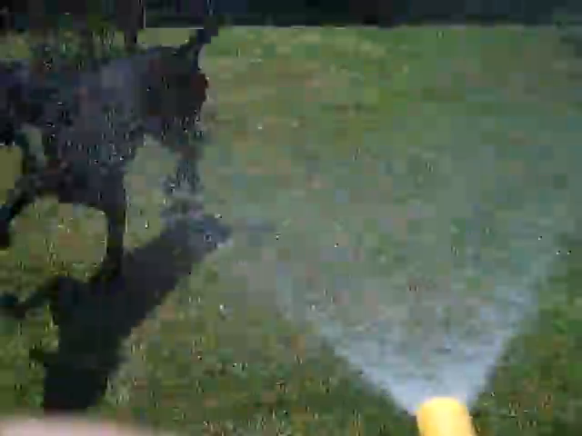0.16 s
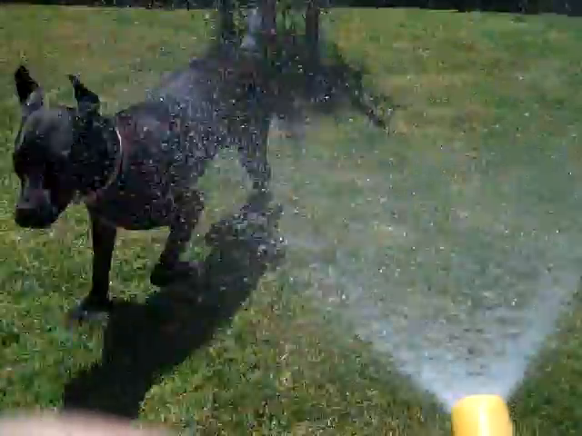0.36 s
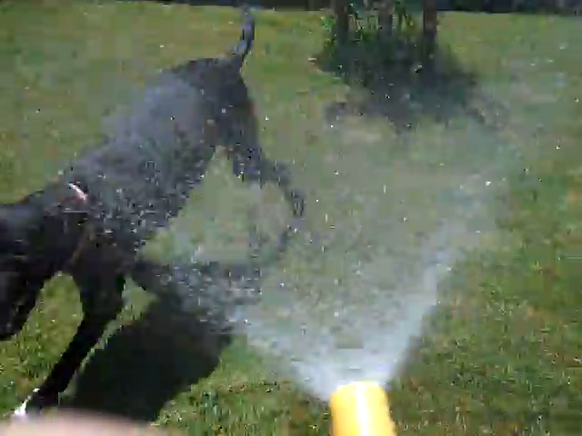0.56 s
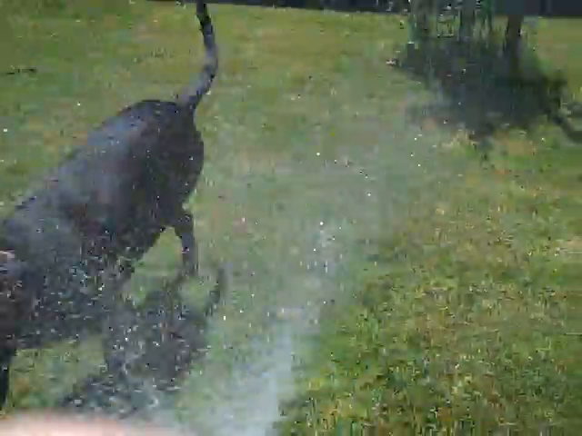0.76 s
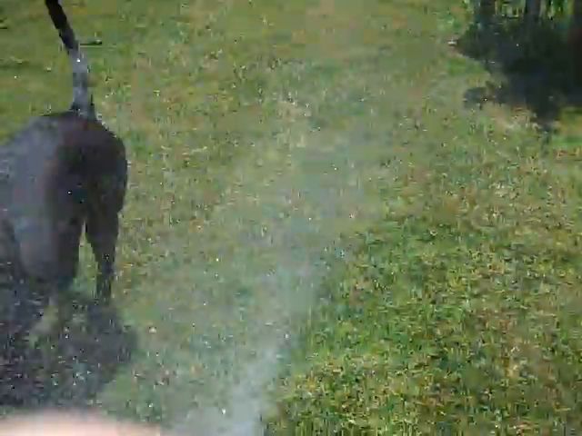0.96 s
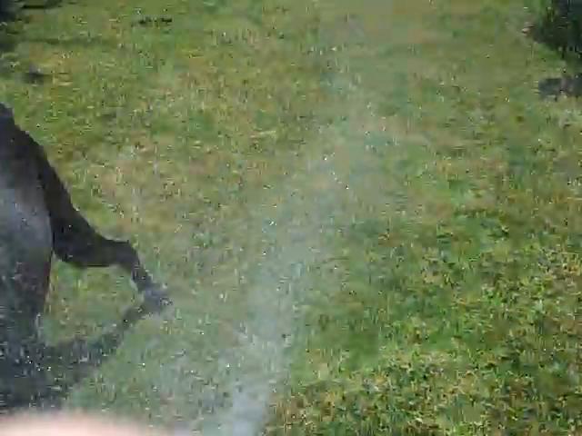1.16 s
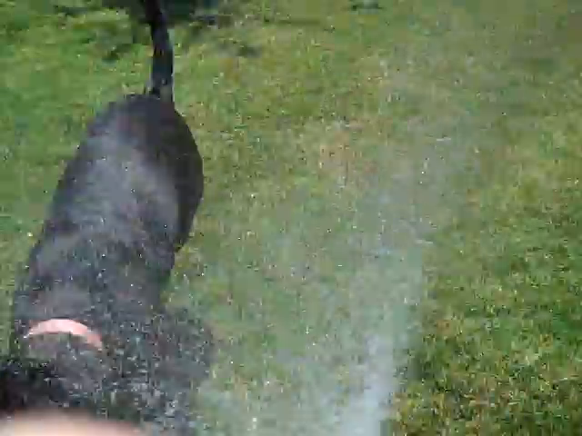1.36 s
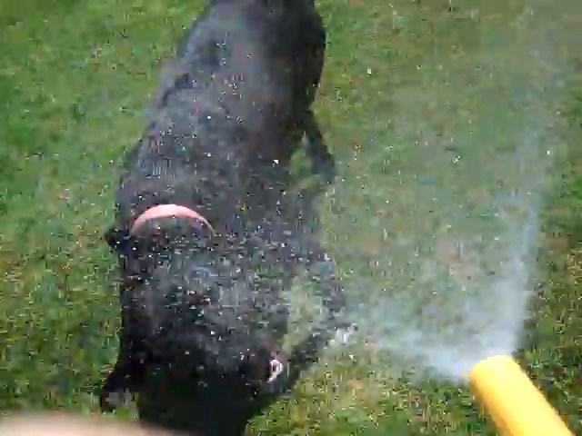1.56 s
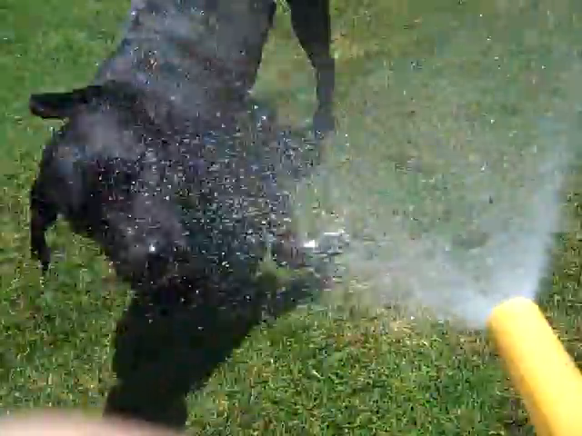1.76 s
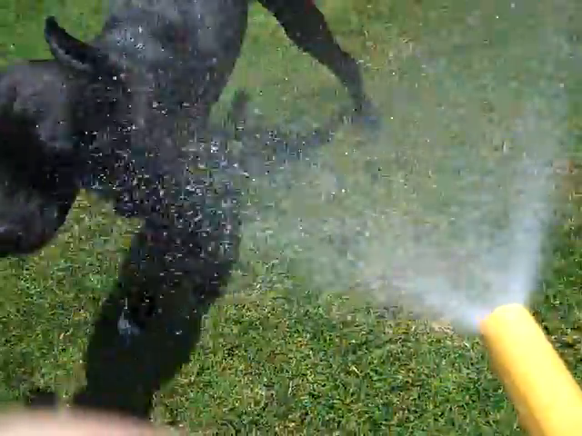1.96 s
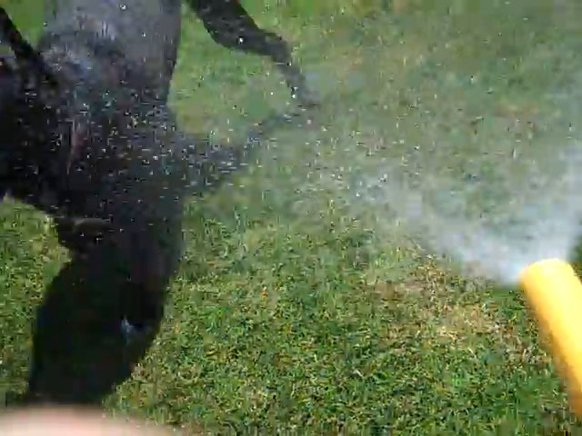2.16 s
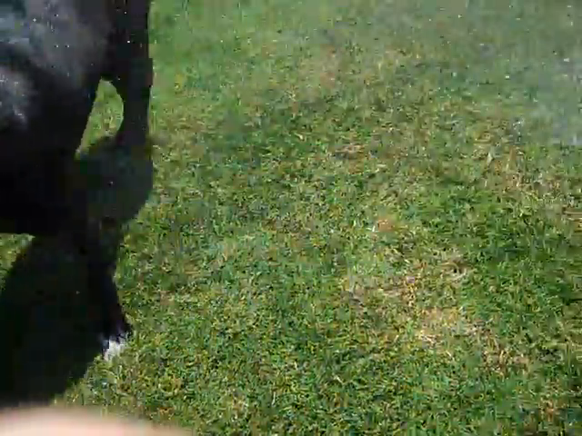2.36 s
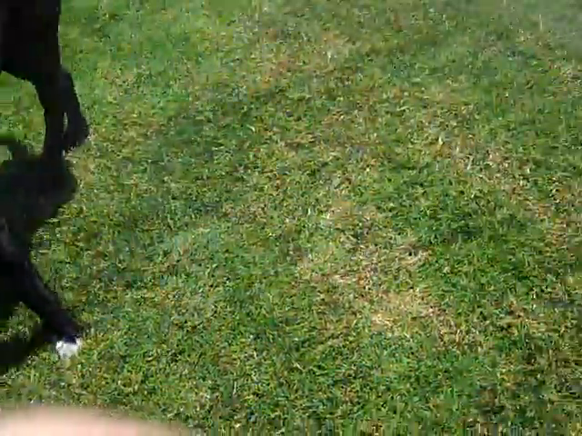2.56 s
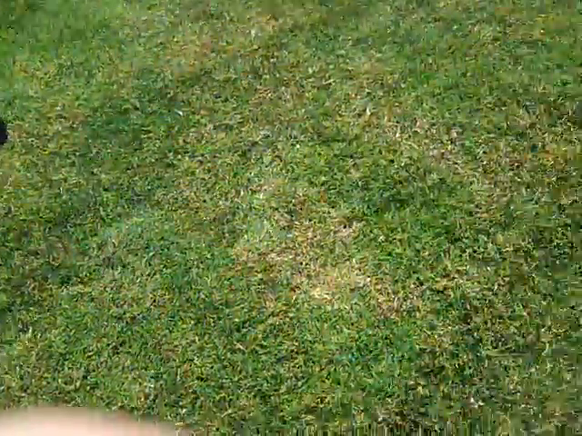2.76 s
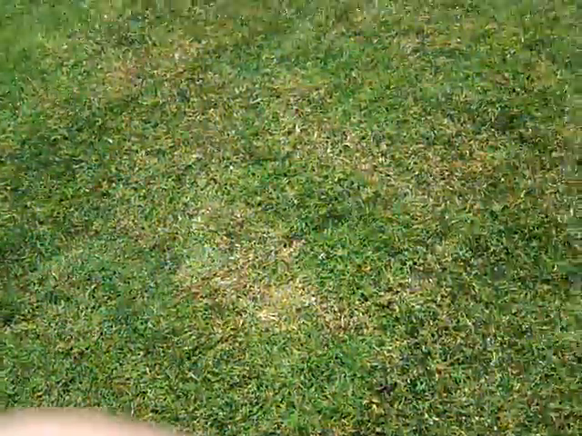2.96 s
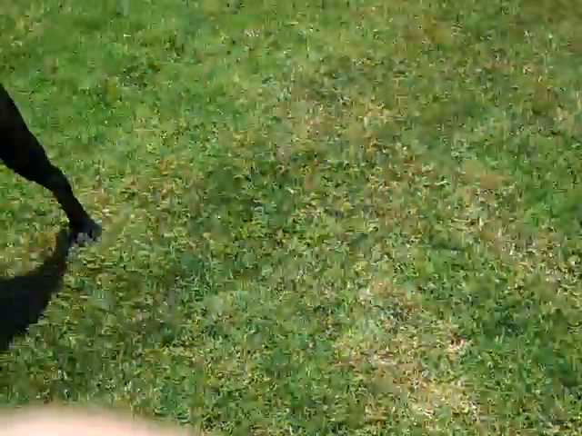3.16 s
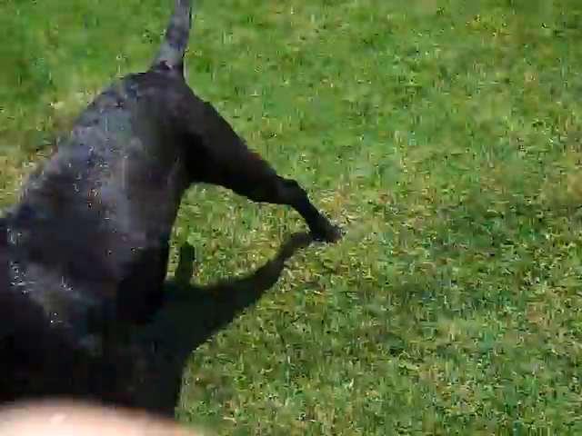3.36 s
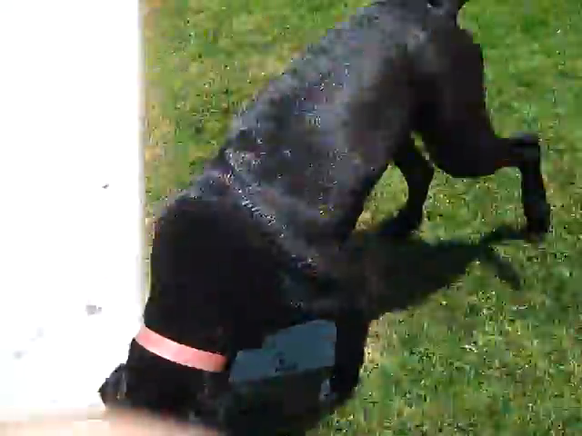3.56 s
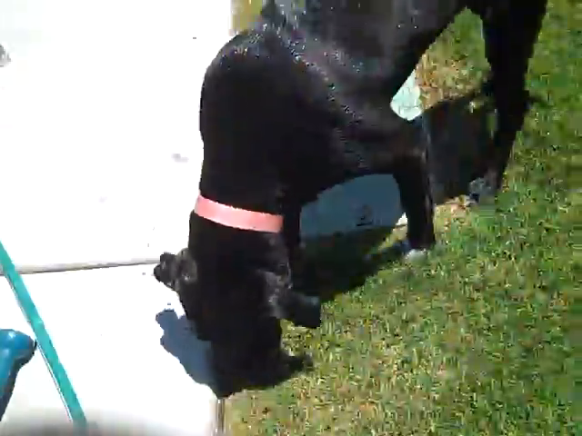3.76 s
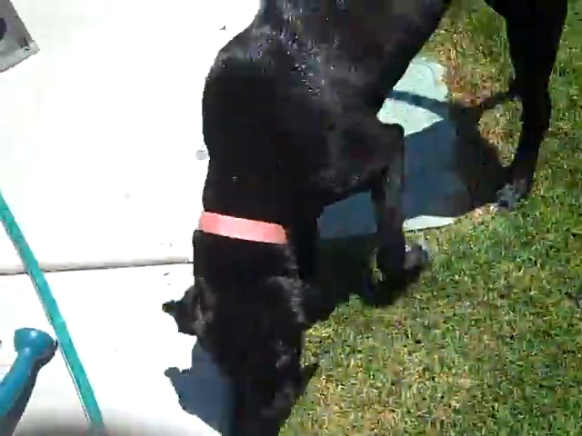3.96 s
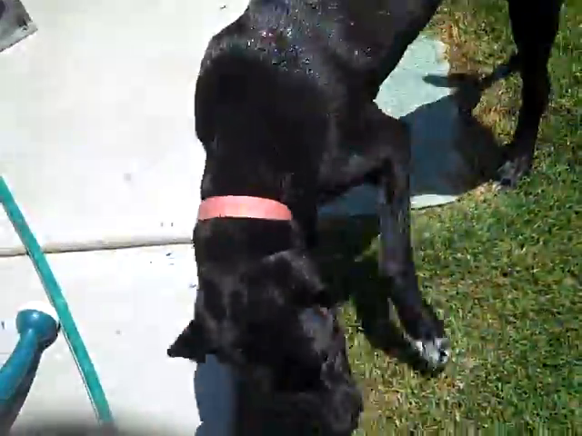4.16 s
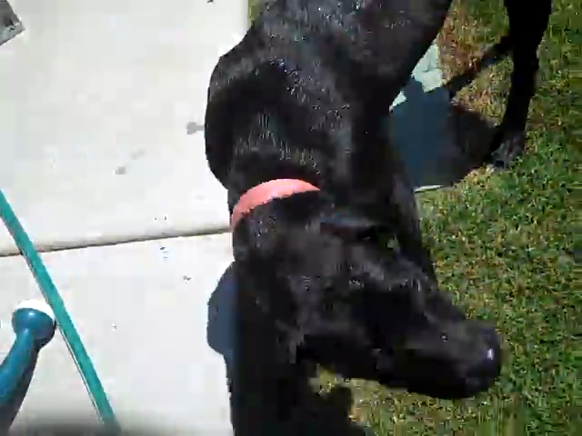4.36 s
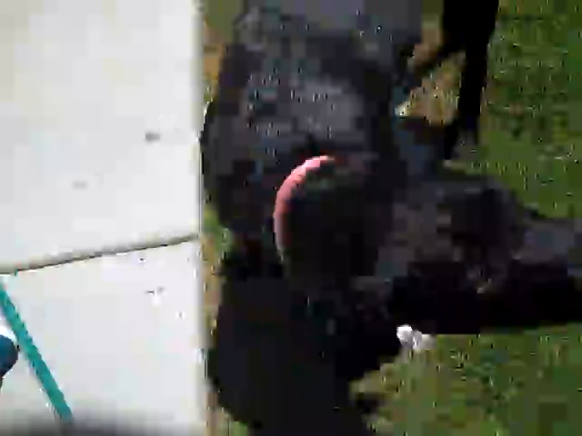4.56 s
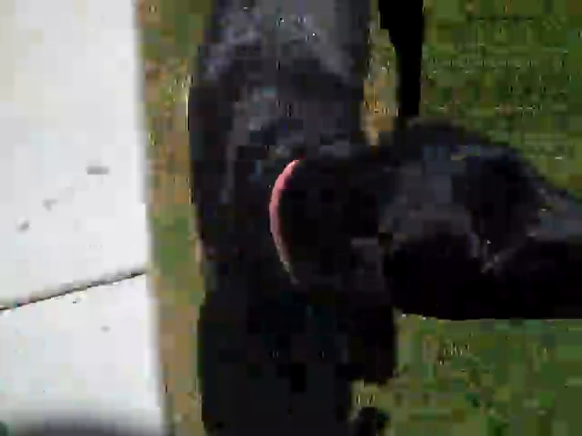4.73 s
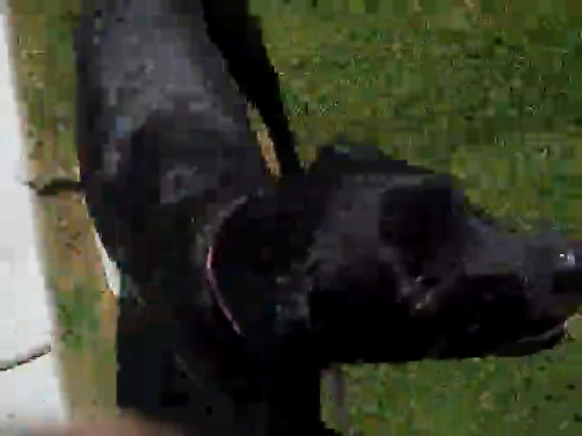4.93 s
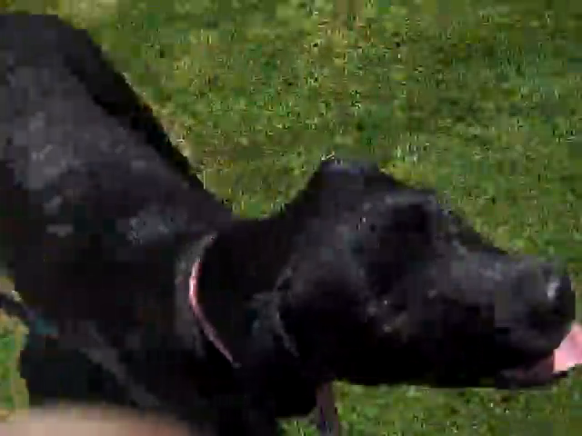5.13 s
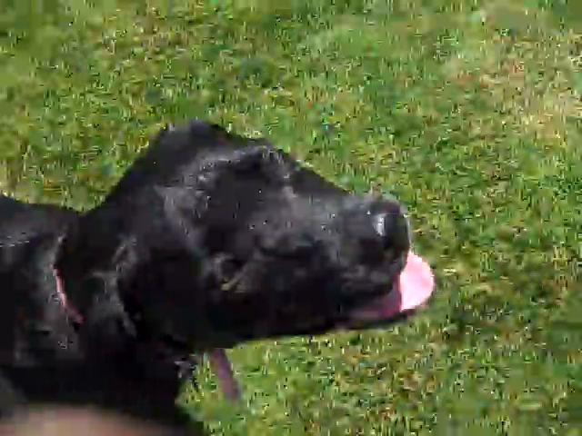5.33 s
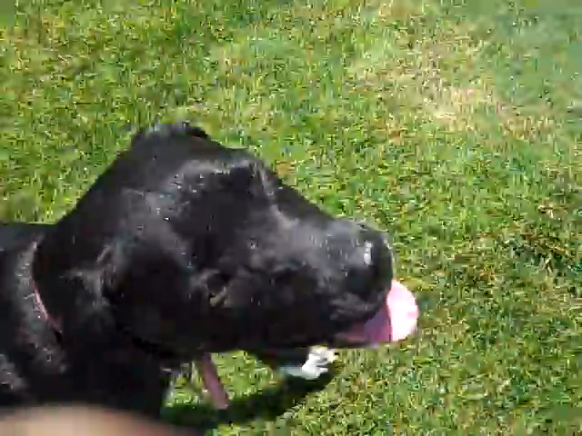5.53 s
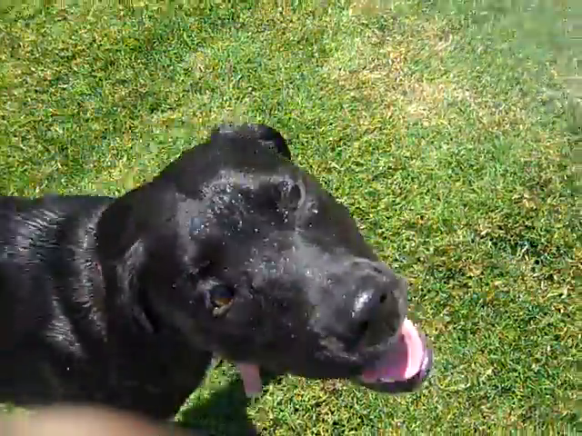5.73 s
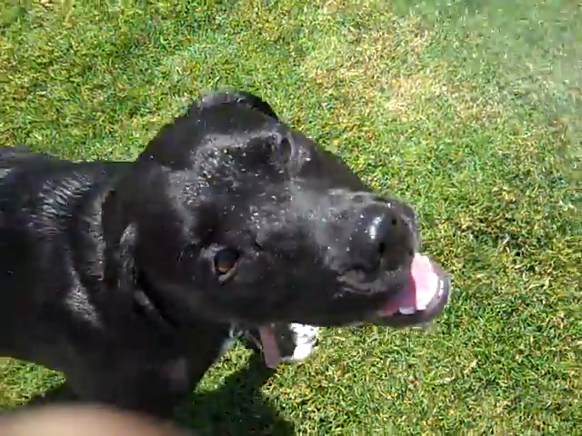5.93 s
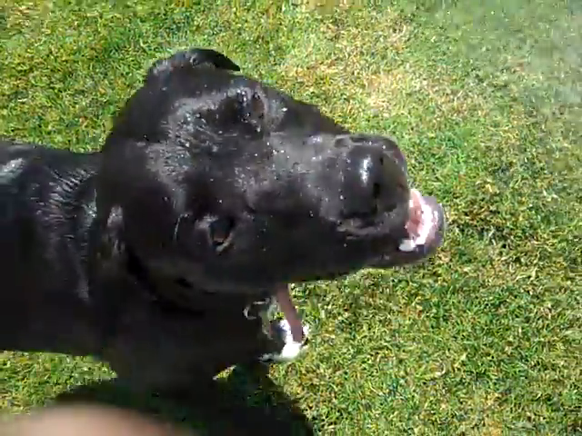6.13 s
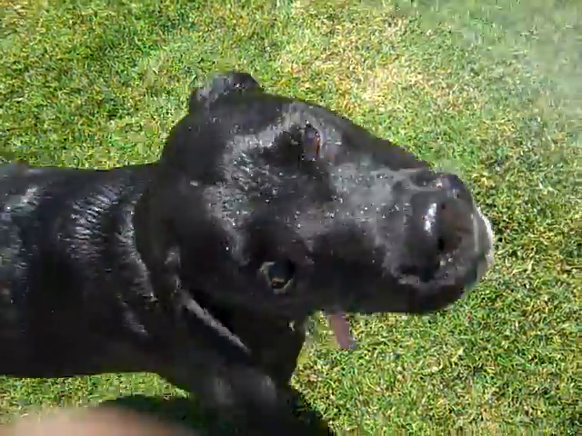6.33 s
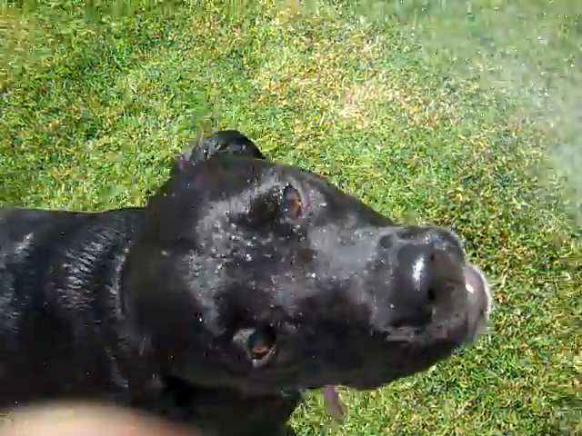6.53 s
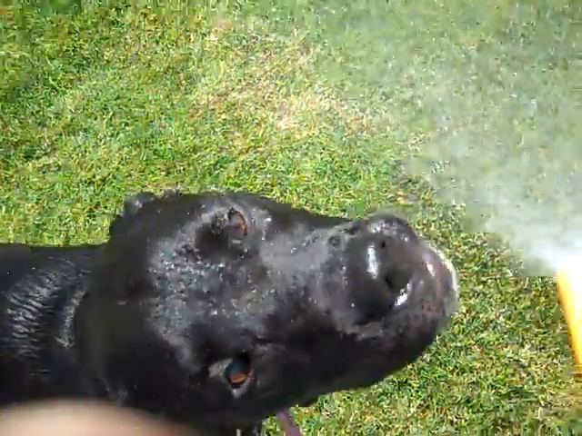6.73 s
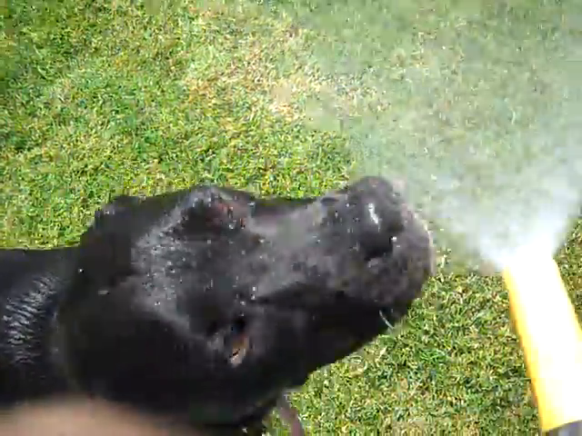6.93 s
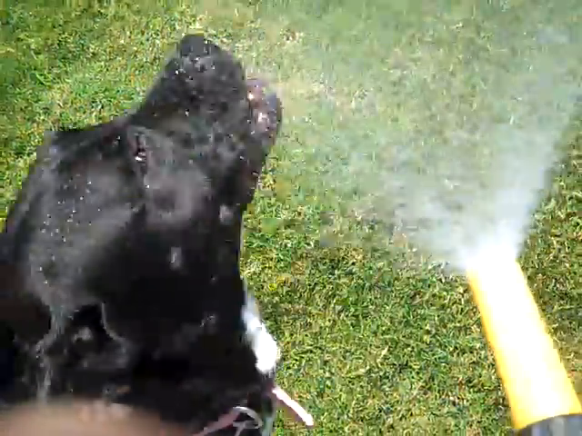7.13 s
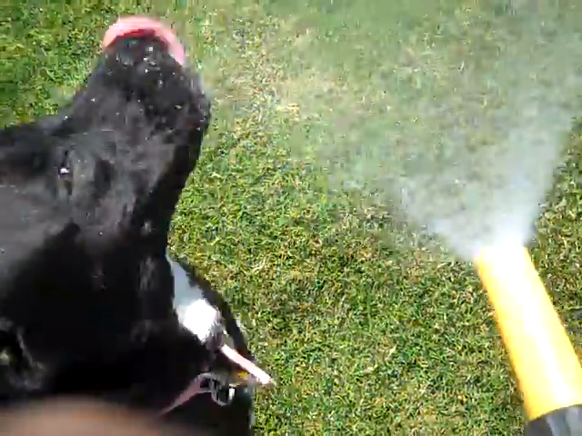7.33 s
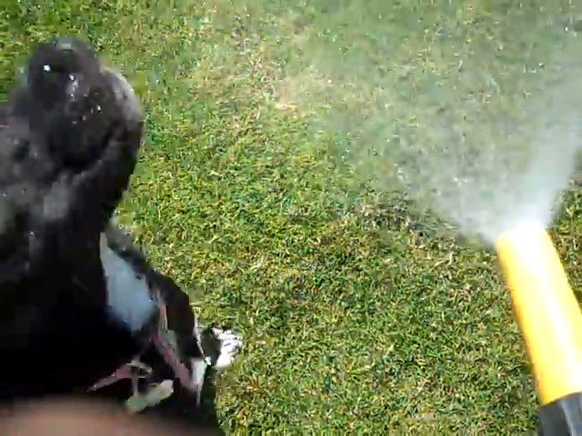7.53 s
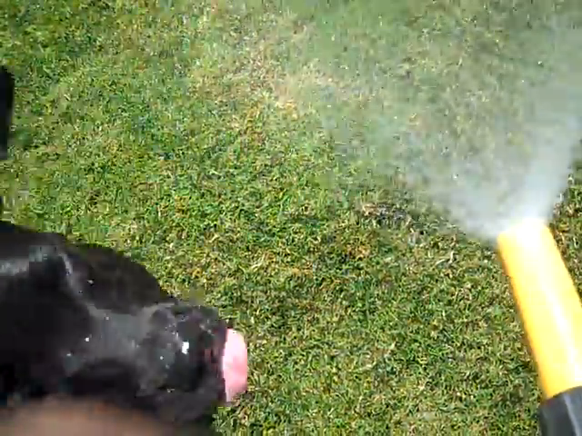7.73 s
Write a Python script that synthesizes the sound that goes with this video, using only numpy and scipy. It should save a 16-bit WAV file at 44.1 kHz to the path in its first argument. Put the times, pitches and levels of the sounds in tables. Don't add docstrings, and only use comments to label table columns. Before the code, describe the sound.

For nearly eight seconds a hose nozzle sprays continuously close to a handheld phone in a backyard. The sound is a loud, bright, sizzling hiss with fine mist and grainy bursting droplets, fluttering slightly. Short air spurts puff out around 0.6, 0.7 and 1.4 seconds, cluster between 1.9 and 3.3, then recur near 3.9, 4.3, 5.0 and faintly at 6.5, some followed by a quick dip in level. Tiny metallic collar tag ticks come at 0.3 and between 1.2 and 1.7, mostly left; dull paw or handling taps gather from 1.1 to 1.5, with a low thump near 4.9 and a very faint tap near 7.4. From about 3.5 to 5 the phone turns aside: the left side grows duller and more hollow, and a steady low fan hum with rumble is clearest, easing afterward. A soft outdoor wash lies beneath. Treble is slightly rough and compressed; the spray continues to the end.

```python
import sys
import numpy as np
from scipy import signal
from scipy.fft import rfft, irfft
from scipy.io import wavfile
from scipy.ndimage import uniform_filter1d, map_coordinates

SR = 44100
rng = np.random.default_rng(int(sys.argv[2]) if len(sys.argv) > 2 else 0)


def gain_from_decibels(decibels):
    exponent = np.asarray(decibels, float) / 20
    return 10 ** exponent


def file_out(sig):
    cols = np.atleast_2d(sig).T
    lim = np.clip(cols, -1, 1)
    pcm = np.round(lim * 32767).astype(np.int16)
    wavfile.write(sys.argv[1], SR, pcm)


N = 347949
TIME = np.arange(N) / SR


def level(x, db):
    return x * gain_from_decibels(db) / np.sqrt(np.mean(x ** 2))


def curves(table):
    s, *columns = np.transpose(table)
    return [np.interp(TIME, s, column) for column in columns]


def colour(x, points):
    hz, db = np.transpose(points)
    grid = np.maximum(np.arange(2049) * SR / 4096, 1)
    cepstrum = irfft(np.log(gain_from_decibels(np.interp(np.log(grid), np.log(hz), db))))
    cepstrum[1:2048] *= 2
    cepstrum[2049:] = 0
    return signal.fftconvolve(x, irfft(np.exp(rfft(cepstrum))))[:N]


def ring(x, hz, width):
    return signal.lfilter(*signal.iirpeak(hz, hz / width, fs=SR), x)


def shelf(x, hz, gain, above):
    low = signal.filtfilt(*signal.butter(2, hz, fs=SR), x)
    high = x - low
    return low + gain * high if above else gain * low + high


def walk(rate):
    hold = int(SR / rate)
    steps = np.repeat(rng.standard_normal(N // hold + 1), hold)
    return 1.3 * uniform_filter1d(uniform_filter1d(steps, hold), hold)[:N]


def strikes(times, db):
    out = np.zeros(N)
    out[(np.asarray(times) * SR).astype(int)] = gain_from_decibels(np.asarray(db))
    return out


def delayed(x, samples):
    return map_coordinates(x, [np.arange(N) - samples], order=3, mode="nearest")


# (t/s, left port lag/ms, level/dB, nozzle tipped away 0-1)
AIM = [(0.0, 0.016, -17.5, 0.2), (.3, 0.041, -15, 0.2), (.62, 0.035, -16, 0.1), (1.1, 0.012, -16, 0.74),
       (1.4, 0.021, -14.5, 0.63), (1.65, .04, -14.5, 0.16), (2.25, .042, -16, 0.05),
       (2.5, 0.065, -14, 0.44), (2.85, 0.092, -13, 0.96), (3.3, 0.095, -16, .2), (3.65, 0.11, -15.5, 0.58),
       (4.8, 0.11, -15, 0.2), (5.25, .096, -13.5, 0.44), (5.5, 0.084, -13.5, 0.54), (6.2, 0.072, -14, 0.7),
       (6.65, 0.059, -12.5, 0.8), (7.1, 0.04, -14.5, .3), (7.89, 0.043, -14.5, 0.21)]
# (f/Hz, width/Hz, level above 10 kHz/dB)
PORTS = [
    (7877, 1170, -4),
    (6815, 1147, -10),
]
# (t/s, length/s, swell level/dB, later gain duck level/dB)
SPURTS = [(0.572, 0.019, 7, 1.5), (0.727, 0.0065, 3, 3), (1.449, .008, 1.5, 1.5), (1.933, 0.0053, 1, 2),
          (2.195, 0.01, 3.5, 2), (2.58, 0.013, 3, 6), (2.773, 0.0055, 5, -1), (2.819, 0.011, 0.5, 5.5),
          (3.007, 0.0078, 4, -1.5), (3.275, 0.0062, 3, -0.5), (3.338, 0.011, 4, 3), (3.857, 0.014, 4, -1.5),
          (3.908, .008, 2, 0.5), (4.325, 0.015, 3, 0.5), (4.863, 0.0072, 3, -1), (5.035, 0.011, 3, 0),
          (6.5, 0.012, 0, 1)]


def spray():
    lag_ms, level_db, away = curves(AIM)
    swell_db = sum(db * np.exp(-((TIME - s) / length) ** 2) for s, length, db, _ in SPURTS)
    jet = nozzle_jet(swell_db, level_db)
    late_jet = delayed(jet, (lag_ms + 0.003) * SR / 1000)
    heard = [at_port(late_jet, swell_db, *PORTS[0]), at_port(jet, swell_db, *PORTS[1])]
    left, right = level(np.array(heard), 0.21)
    aside = np.interp(lag_ms, (0.083, 0.11), (0, 1))
    left = hand_mirror(shaded_left(left, lag_ms, away, aside))
    right = right + (gain_from_decibels(5 * aside) - 1) * ring(right, 4900, 1300)
    right = shelf(right, 9600, gain_from_decibels(4.5 - 10.5 * away), above=True)
    return gain_from_decibels(level_db) * np.array([left, right])


# (t/s, peak level/dB)
DROPS = [(1.102, -15.5), (1.9313, -20.5), (2.1889, -19), (2.5847, -19), (2.7721, -31), (2.8152, -18),
         (3.285, -22), (3.8637, -23), (3.9019, -18), (4.0328, -18.5), (6.2056, -21), (6.48, -16.5)]


def nozzle_jet(swell_db, level_db):
    jet = droplets(2500, 2.6, 0.22) * gain_from_decibels(swell_db + 0.49 * walk(9) + 0.52 * walk(35))
    fat_drops = shelf(strikes(*np.transpose(DROPS)), 2500, gain_from_decibels(-19), above=False)
    jet = jet + fat_drops * gain_from_decibels(29 - level_db)
    return shelf(jet, 2400, gain_from_decibels(2.8 * walk(8)), above=False)


def droplets(per_s, spread_db, share):
    when, size, sign = rng.random((3, N))
    size_gain = gain_from_decibels(-spread_db * np.log(size + 1e-4))
    pops = (when < per_s / SR) * size_gain * np.sign(sign - .5)
    share = np.clip(share, 0, 1)
    mist = np.sqrt(1 - share) * rng.standard_normal(N)
    return mist + np.sqrt(share) * level(pops, 0)


# (f/Hz, level/dB per Hz)
SPRAY_COLOUR = [(200, -36.5), (1000, -25), (1400, -17), (2600, -7), (3200, -5.5), (4500, -3), (6000, 1),
                (8000, -1.5), (10000, -4.5), (12500, -3), (14500, -6.5)]


def at_port(jet, swell_db, hz, width, top_db):
    splash = shelf(droplets(4000, 2.8, 0.16), 11800, gain_from_decibels(15.0 + 2.3 * walk(6.7)), above=True)
    splash = splash * gain_from_decibels(-11.5 + swell_db)
    rung = cavity(colour(jet + splash, SPRAY_COLOUR), hz, width)
    return shelf(rung, 10600, gain_from_decibels(top_db), above=True)


def cavity(x, hz, width):
    b, a = signal.bilinear([1], [1, width / hz, 1], fs=.5 / np.tan(np.pi * hz / SR))
    return signal.lfilter(b, a, x)


# (left port lag/ms, f/Hz, width/Hz)
HOLLOWS = [
    (.082, 5090, 1007),
    (.097, 6030, 1000),
    (.106, 7200, 800),
    (.116, 9000, 1300),
]


def shaded_left(left, lag_ms, away, aside):
    left = shelf(left, 6200, gain_from_decibels(4 - 91.5 * lag_ms), above=True)
    hollow_db = -6 + 1 * away + 0.1 * walk(5.2)
    hollow_lags = np.transpose(HOLLOWS)[0]
    for one_hot, (_, hz, width) in zip(np.eye(len(HOLLOWS)), HOLLOWS):
        nearness = np.interp(lag_ms, hollow_lags, one_hot)
        left = left + (gain_from_decibels(hollow_db * nearness) - 1) * ring(left, hz, width)
    left = left + (gain_from_decibels(3.5 * aside) - 1) * ring(left, 5000, 1900)
    left = shelf(left, 4300, gain_from_decibels(-3.5 * aside), above=False)
    return shelf(left, 10300, gain_from_decibels(-2 + 76 * lag_ms), above=True)


# (t/s, first notch f/Hz, reflected share 0-1)
HAND = [(3.05, 7300, 0.05), (3.2, 7440, 0.43), (3.6, 11300, 0.31), (3.9, 9700, 0.13), (4.7, 9200, 0.11),
        (5.3, 7500, 0.23), (6.4, 6960, 0.12), (6.8, 7050, 0.14)]


def hand_mirror(left):
    notch_hz, share = curves(HAND)
    return left + share * delayed(left, SR / (2 * notch_hz))


def dog():
    return paw_taps() + collar_tag() * gain_from_decibels(np.array([[3], [-14]]))


# (t/s, peak level/dB, f/Hz)
TAPS = [(1.109, -23, 1200), (1.2018, -25.5, 533), (1.255, -36, 500), (1.291, -25, 1500), (1.304, -35, 550),
        (1.401, -33, 550), (1.4993, -18.5, 2100), (1.512, -30, 380), (4.891, -27, 144), (7.382, -38, 219.4)]


def paw_taps():
    taps = np.zeros(N)
    for s, db, hz in TAPS:
        span = slice(int(s * SR), int(s * SR + 8 * SR / hz))
        age = np.maximum(TIME[span] - s, 0) * hz
        taps[span] += gain_from_decibels(db) * 9 * age * np.exp(-age / 0.39) * np.sin(2 * np.pi * age)
        taps[span] += gain_from_decibels(db - 12) * 6 * age * np.exp(-age / 0.31) * np.sin(2 * np.pi * 5.0 * age)
    return taps


# (t/s, peak level/dB)
TAG = [(0.3152, -32), (1.1583, -19.5), (1.3428, -24), (1.36, -21), (1.725, -28), (1.7392, -41)]
# (f/Hz, level/dB, time to fall 60 dB/s)
TAG_MODES = [
    (13050, 0, .025),
    (14100, -2, .025),
    (9700, -4, .015),
]


def collar_tag():
    age = np.arange(SR // 10) / SR
    modes = sum(gain_from_decibels(db - 60 * age / t60) * np.sin(2 * np.pi * hz * age) for hz, db, t60 in TAG_MODES)
    return signal.fftconvolve(strikes(*np.transpose(TAG)), modes)[:N]


# (t/s, blade tone level/dB)
FAN = [(0.0, -56), (0.7, -64), (1.1, -54.5), (1.76, -51), (3.18, -49), (3.36, -53), (3.49, -44),
       (3.8, -37.5), (4.81, -38.5), (5.45, -45), (7.76, -47.5), (7.89, -49)]
# (f/Hz, width/Hz, level/dB)
RUMBLE = [
    (54.9, 3.1, 3.5),
    (110.5, 1.9, -1.5),
    (176.4, 14, -2),
]


def fan(tone_db, rumble_db):
    phase = 2 * np.pi * np.cumsum(271.9 + 0.53 * walk(12)) / SR
    blades = np.sin(phase) + gain_from_decibels(-25) * np.sin(3 * phase)
    tone = np.sqrt(2) * gain_from_decibels(tone_db + 0.29 * walk(4.9)) * blades
    rumble = sum(level(ring(rng.standard_normal(N), hz, width), db) for hz, width, db in RUMBLE)
    both_ports = np.array([tone, np.roll(tone, -4)])
    return both_ports + level(rumble, -2.1) * gain_from_decibels(rumble_db)


# (f/Hz, level/dB per Hz)
YARD = [(15, -34), (25, -14), (64, 1), (216, -5.5), (269, -3), (329, -4), (983, -5), (1400, -20),
        (1820, -17), (3080, -120)]


def yard(wash_db, lag_ms):
    mid = colour(rng.standard_normal(N), YARD)
    side = colour(rng.standard_normal(N), YARD)
    side = (0.33 + 2.6 * lag_ms) * shelf(side, 220, gain_from_decibels(-2.5), above=False)
    return level(mid + side * np.array([[1], [-1]]), 2.42) * gain_from_decibels(wash_db + 0.27 * walk(7.9))


def scene():
    tone_db, = curves(FAN)
    lag_ms = curves(AIM)[0]
    rumble_db = -56 + 86 * lag_ms
    wash_db = -49 + 0.2 * (tone_db + 51.5)
    return spray() + dog() + fan(tone_db, rumble_db) + yard(wash_db, lag_ms)


# (start t/s, end t/s, top f/Hz)
LOWER_TOP = [
    (1.85, 2.35, 13400),
    (6.3, 6.58, 13500),
    (6.58, 7.9, 12500),
]
# (start t/s, end t/s, low f/Hz, high f/Hz)
AGREE = [
    (3.2, 3.65, 9300, 10600),
    (3.75, 4.85, 8950, 9600),
    (5.0, 5.25, 9200, 10300),
]


def thrift(x, side_db, faint_db):
    frame = dict(window="cosine", nperseg=2048, noverlap=1024)
    hz, s, z = signal.stft(x, SR, **frame)
    pitch = hz[:, None]
    luck_db = 5 * blocks(rng.standard_normal(z.shape), size=12)
    pair = np.array([z[0] + z[1], z[0] - z[1]]) / 2
    band = blocks(abs(pair) ** 2, size=12)
    near_middle = abs(s - 4.35) < .5

    sum_db = -13 + 20 * masked(pitch, s, luck_db[0, 200])
    sum_db = sum_db + (9 + 3 * near_middle) * (abs(pitch - 3100) < 150)
    limit_db = blocks(np.array([sum_db, side_db + 0 * sum_db]), size=12)
    middle = (pitch > 450) & (pitch < 5200)
    weak = band < band[::-1] * gain_from_decibels(2 * (limit_db + luck_db))
    pair = pair * ~(middle & weak)
    pair = pair * ~((pitch > 1500) & (pitch < 4700) & (abs(pair) ** 2 < .8 * band))

    thin_top = (s > 3.5) & (s < 4.85) & (pitch > 10800) & (luck_db[0] > -.3)
    flicker = near_middle & (abs(pitch - 3600) < 350) & (luck_db[1] > .3)
    pair[0] = pair[0] * ~(thin_top | flicker)
    for start, end, low, high in AGREE:
        agreed = (s > start) & (s < end) & (pitch > low) & (pitch < high)
        pair[1] = pair[1] * ~(agreed & (luck_db[1] > -1.2))

    z = np.array([pair[0] + pair[1], pair[0] - pair[1]])
    loud = np.mean(abs(z) ** 2, axis=(0, 1))
    faint = (pitch > 9000) & (blocks(abs(z) ** 2, size=6) < loud * gain_from_decibels(2 * (faint_db + 7 * luck_db)))
    top_hz = 14200 - sum((14200 - top) * (s > start) * (s < end) for start, end, top in LOWER_TOP)
    z = z * ~faint * (pitch < top_hz)
    return signal.istft(z, SR, **frame)[1][:, :N]


# (t/s, length/s, shift f/Hz, widening f/Hz)
BAND_MOVES = [(2.9, .36, 50, 220), (3.44, .09, 550, 0), (3.6, .1, -300, 300), (4.3, .55, -230, -160),
              (5.06, .22, 50, 550), (6.77, .13, -800, -250)]


def masked(pitch, s, luck_db):
    turns = [np.exp(-((s - at) / length) ** 4) * np.array([[shift], [wider]])
             for at, length, shift, wider in BAND_MOVES]
    edge, width = np.array([[4500], [450]]) + sum(turns)
    width = width + 150 * np.maximum(luck_db, -1)
    return (pitch < edge) & (pitch > edge - width) & (s > 2.5) & (s < 6.9)


def blocks(power, size):
    for axis, step in ((1, size), (2, 2)):
        length = power.shape[axis]
        means = np.add.reduceat(power, np.arange(0, length, step), axis=axis) / step
        power = np.take(np.repeat(means, step, axis=axis), np.arange(length), axis=axis)
    return power


def band_limit(x):
    return signal.sosfilt(signal.butter(12, 14990, fs=SR, output="sos"), x)


def record(dry):
    duck_db = 0
    for s, length, _, db in SPURTS:
        since = TIME - s - length
        duck_db = duck_db + db * (TIME > s + length) * np.exp(-np.maximum(since, 0) / 0.064)
    gain = gain_from_decibels(-uniform_filter1d(duck_db, size=200))
    mix = thrift(np.clip(dry * gain, -1, 1), side_db=-4, faint_db=-20.5)
    return band_limit(np.clip(mix, -1, 1))


dry = scene()
out = record(dry)
file_out(out)
```